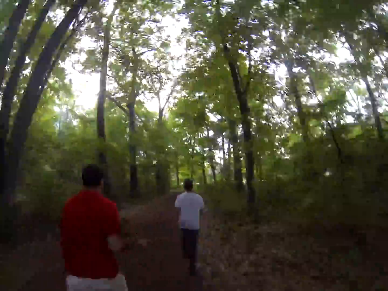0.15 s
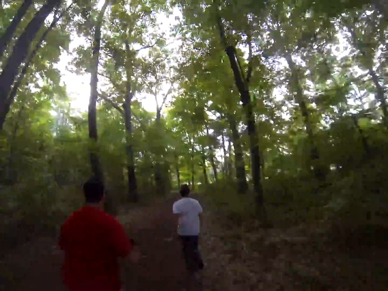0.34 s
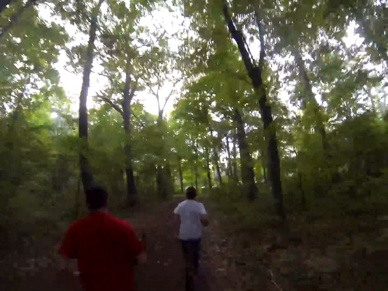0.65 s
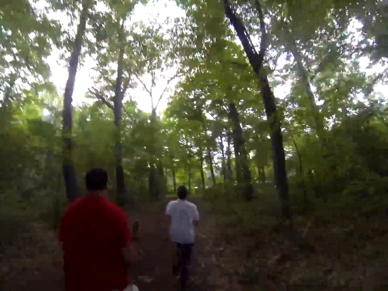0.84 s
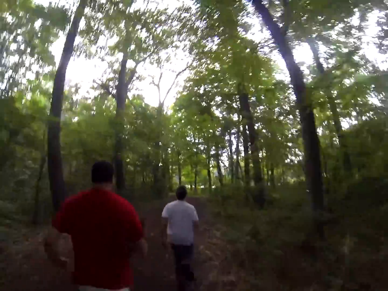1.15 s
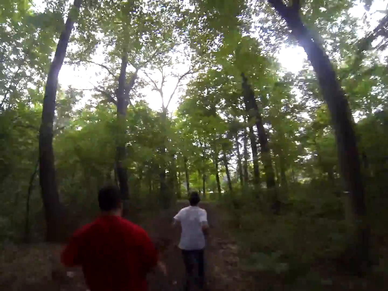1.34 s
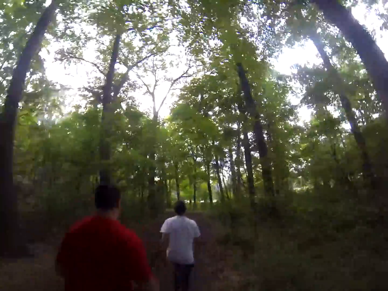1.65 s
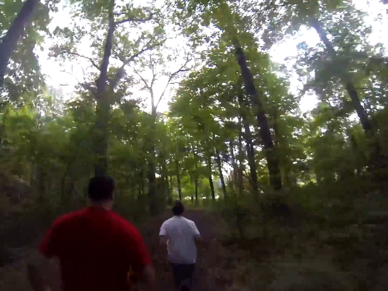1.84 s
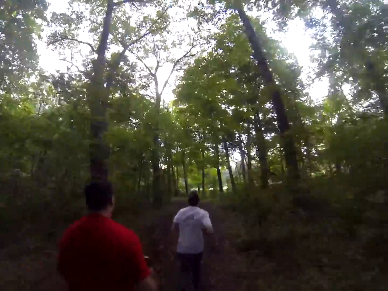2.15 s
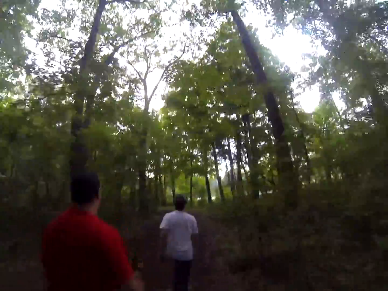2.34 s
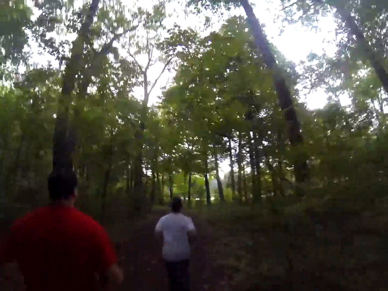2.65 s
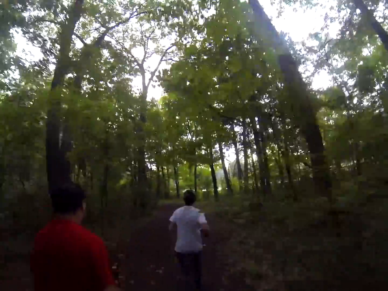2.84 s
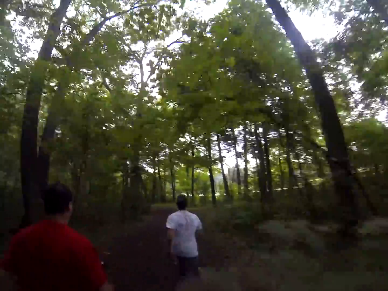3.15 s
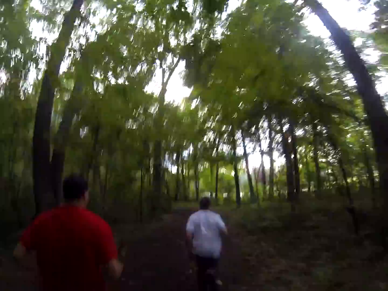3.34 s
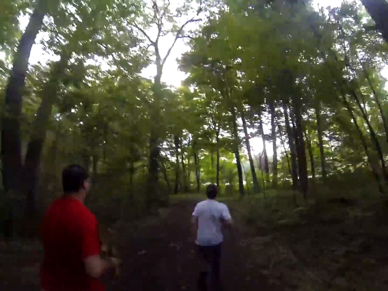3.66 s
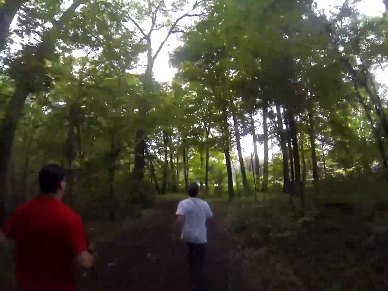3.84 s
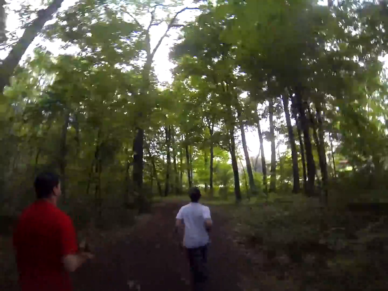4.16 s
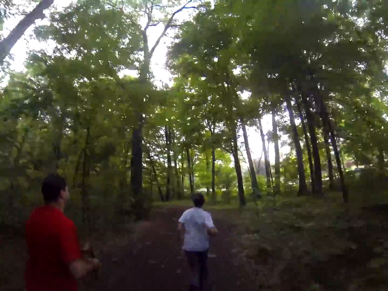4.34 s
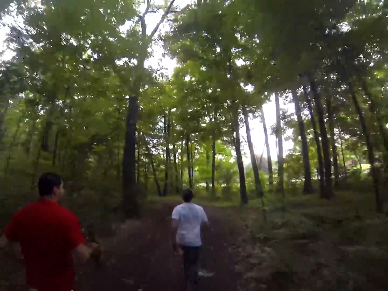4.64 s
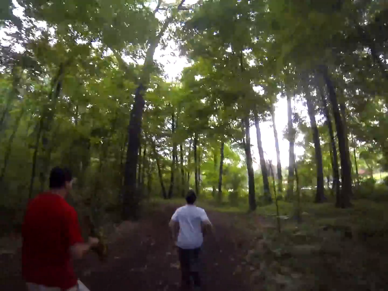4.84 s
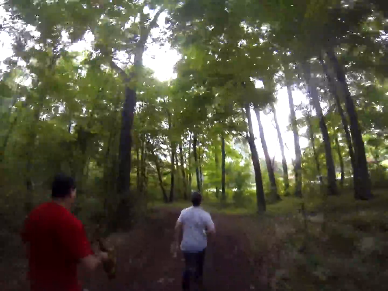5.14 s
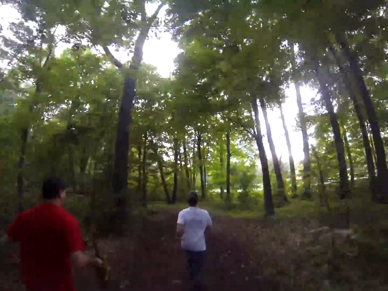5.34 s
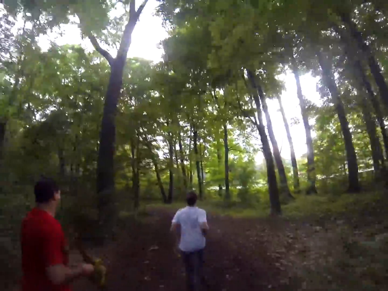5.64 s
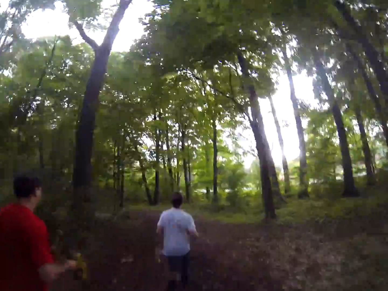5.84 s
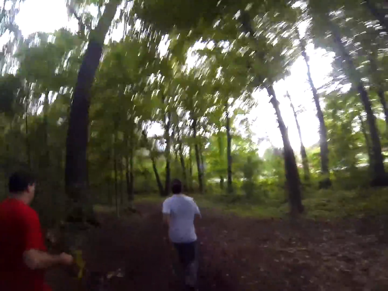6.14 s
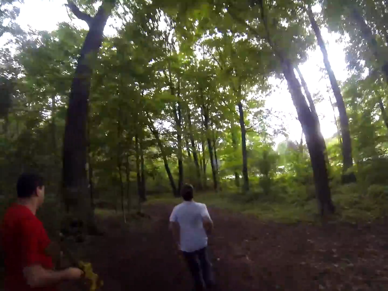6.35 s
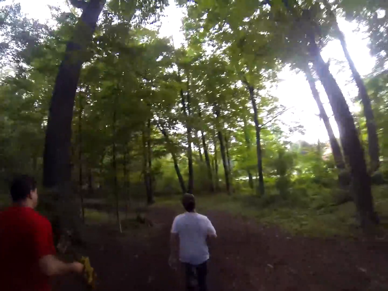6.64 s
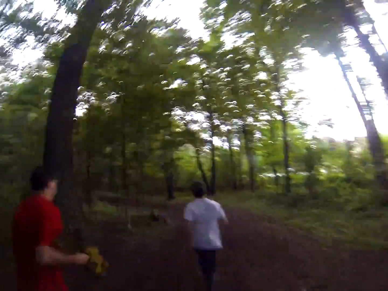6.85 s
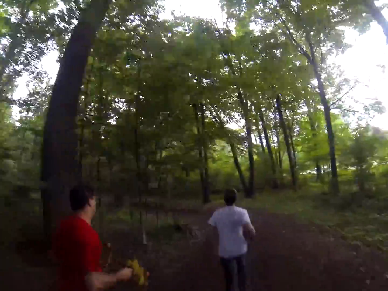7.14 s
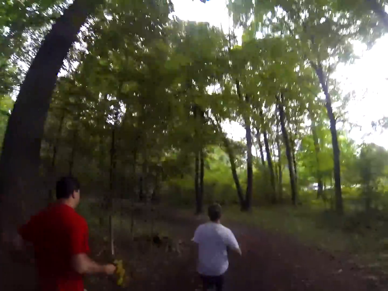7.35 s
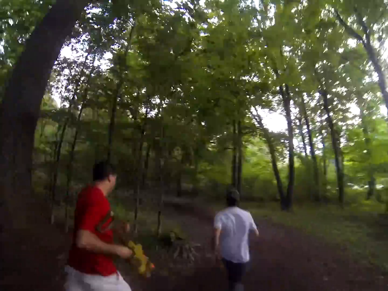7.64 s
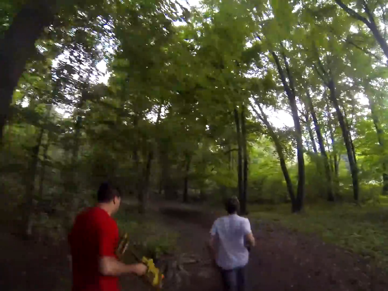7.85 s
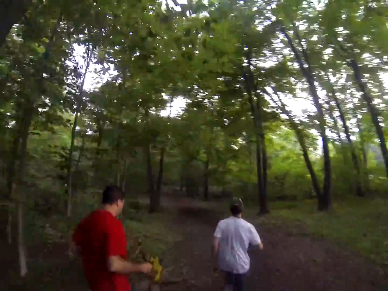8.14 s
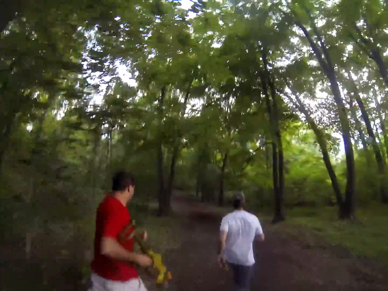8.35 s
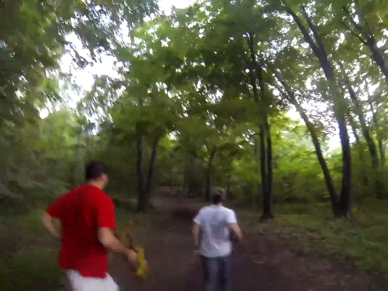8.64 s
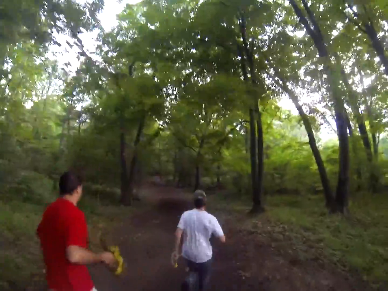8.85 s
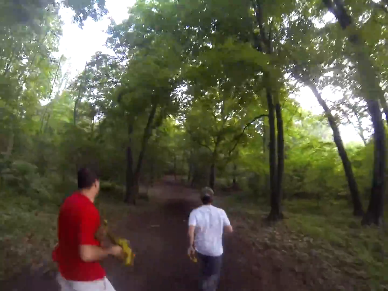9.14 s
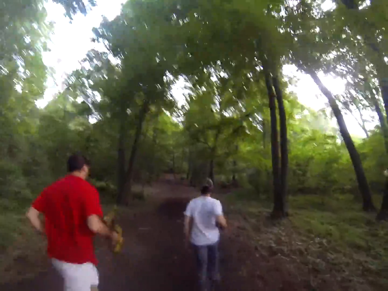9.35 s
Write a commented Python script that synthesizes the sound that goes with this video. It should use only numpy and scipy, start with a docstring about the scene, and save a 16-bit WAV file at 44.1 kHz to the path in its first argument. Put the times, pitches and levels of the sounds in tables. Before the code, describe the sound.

Close inside a plastic case worn by a jogger on a woodland dirt trail: steady footfalls, nearly three a second, crunch grit. Low wind rumbles and flaps with every stride over a soft rustle of cloth and leaves. Hard hollow knocks of the case strike now and then, clustering into a loud rattle after seven seconds, with twig snaps and stone clicks.

```python
"""Woodland trail run from inside a camera case

A jogger wearing a camera in a plastic case follows two others along a dirt trail in woods.
Wind is shaped noise surging with each stride; cloth, leaves, grit and stones are noise and random clicks,
coloured as they sound through the boxy shell. The case knocks on its loose mount as ringing modes struck
by a chattering contact, and wobbles as a slow decaying sine. Twigs snap, something brushes the case,
and a thin whistle comes and goes."""
import sys
import numpy as np
from scipy import signal
from scipy.fft import rfft, irfft, next_fast_len
from scipy.io import wavfile
from scipy.ndimage import uniform_filter1d, minimum_filter1d

SR = 44100
rng = np.random.default_rng(int(sys.argv[2]) if len(sys.argv) > 2 else 0)


def transcribe(signal):
    """Save signal, clipped to [-1, 1], as a 16-bit WAV file at the path in sys.argv[1]."""
    frames = np.atleast_2d(signal).T
    limited = np.clip(frames, -1, 1)
    pcm = np.round(limited * 32767).astype(np.int16)
    wavfile.write(sys.argv[1], SR, pcm)


N = 418509
TIME = np.arange(N) / SR  # s

# the wearer's footfalls (t/s, grit level/dB, rumble surge level/dB, buffeting level/dB), before gains
STRIDES = [(0.085, -22.5, -19, -27), (0.469, -16.5, -29, -27.5), (0.806, -21, -17.5, -23.5),
           (1.176, -21, -33, -32), (1.524, -21, -22.5, -26), (1.905, -15, -26, -35.5),
           (2.279, -19, -28, -25), (2.645, -21, -18, -36), (2.995, -23, -19, -25), (3.375, -10, -33, -26),
           (3.716, -21.5, -20, -31.5), (4.059, -19.5, -24, -32.5), (4.419, -16.5, -21, -25),
           (4.76, -18.5, -24, -31), (5.102, -19.5, -20.5, -26), (5.459, -14.5, -25.5, -26.5),
           (5.78, -17.5, -18, -26), (6.153, -16.5, -24, -30), (6.488, -19, -25, -27.5),
           (6.85, -17, -23.5, -23), (7.225, -15, -21, -24.5), (7.58, -16, -21, -26), (7.931, -18, -21, -33),
           (8.285, -17, -24, -28.5), (8.609, -19.5, -24, -24.5), (8.996, -15, -24, -27),
           (9.365, -23, -27, -28)]
# rustle of clothes and leaves (t/s, middle level/dB, treble level/dB), before gains
RUSTLE_LEVELS = [(0.0, -49, -67), (1.9, -48.5, -67), (2.14, -49.5, -69), (2.67, -44.5, -66.5),
                 (3.17, -50.5, -67.5), (5.08, -48, -67.5), (5.34, -48.5, -68), (6.1, -50, -66.5),
                 (6.29, -47.5, -67), (6.63, -49, -68.5), (7.14, -46, -66.5), (7.32, -56, -70),
                 (7.5, -52, -71), (7.93, -47.5, -65.5), (8.56, -49.5, -69.5), (8.96, -45.5, -64.5),
                 (9.17, -48, -65), (9.49, -51.5, -70)]
# a woody snap as it sounds inside the case (f/Hz, level/dB)
TWIG_SPECTRUM = [(450, 14), (880, -4.5), (1250, 2), (1750, -8.5), (2900, -13), (3600, -29), (4500, -48)]
# a bright crackle as it sounds inside the case (f/Hz, level/dB)
CRACKLE_SPECTRUM = [(1500, -18), (3000, -11.5), (4400, 1), (5500, -8), (7300, -16), (8600, 4.5),
                    (11000, -13), (15000, -20)]


def undb(db):
    """Decibels to gain."""
    return 10 ** (np.asarray(db) / 20)


def unit(x):
    """Scale to an rms of 1."""
    return x / np.sqrt(np.mean(x ** 2))


def curves(table):
    """The columns of a control table after its times, one value per sample."""
    s, *columns = np.transpose(table)
    return [np.interp(TIME, s, c) for c in columns]


def add(out, s, sound):
    """Mix a sound in at time s, trimmed to the scene."""
    i = int(s * SR)
    sound, i = sound[max(-i, 0):], max(i, 0)
    out[i:i + len(sound)] += sound[:max(N - i, 0)]


def colour(x, spectrum):
    """Filter by a (f/Hz, level/dB) spectrum, falling 24 dB per octave beyond its ends; rms 1."""
    hz, db = np.transpose(spectrum)
    size = next_fast_len(N)
    f = np.maximum(np.fft.rfftfreq(size, 1 / SR), 1)
    octaves_beyond = np.abs(np.log2(f / np.clip(f, hz[0], hz[-1])))
    gain_db = np.interp(np.log(f), np.log(hz), db) - 24 * octaves_beyond
    return unit(irfft(rfft(x, size) * undb(gain_db), size)[:N])


def drift(rate):
    """Random levels drawn rate times a second, smoothed twice; rms 1."""
    k = int(SR / rate)
    steps = np.repeat(rng.standard_normal(N // k + 1), k)
    return unit(uniform_filter1d(uniform_filter1d(steps, k), k)[:N])


def grains(rate, spread_db):
    """Random tiny clicks, about rate a second, of scattered size; rms 1."""
    size = undb(spread_db * np.minimum(rng.exponential(size=N), 5))
    return unit((rng.random(N) < rate / SR) * size * rng.standard_normal(N))


def eddies(spectrum, span):
    """Turbulent pressure: coloured noise whose strength is evened out over span seconds."""
    x = colour(rng.standard_normal(N), spectrum)
    return x / np.sqrt(uniform_filter1d(x ** 2, int(span * SR)) + 1e-3)


def hold(x, release_s):
    """Peak follower: rises at once and sinks exponentially."""
    sink = TIME / release_s
    return np.exp(np.maximum.accumulate(np.log(np.abs(x) + 1e-9) + sink) - sink)


def swells(times, levels_db, rise_s, fall_s):
    """An envelope that climbs to each level at its time and dies away again."""
    out = np.zeros(N)
    t = np.arange(-SR // 2, SR // 2) / SR
    shape = np.exp(np.minimum(t / rise_s, -t / fall_s))
    for s, db in zip(times, levels_db):
        add(out, s + t[0], undb(db) * shape)
    return out


def spells(table, column, edge=0.36):
    """A change in dB that comes and goes smoothly over each (t/s, length/s, ..) row."""
    out = np.zeros(N)
    for row in table:
        add(out, row[0], row[column] * signal.windows.tukey(int(row[1] * SR), edge))
    return out


def ring(modes, contact, stretch, scatter=0.018):
    """Modes rung by a contact force, each pitch scattered by that share; energy of 5 ms at rms 1."""
    t = np.arange(len(contact)) / SR
    hz, db, t60 = np.transpose(modes)[:, :, None]
    hz = hz * stretch * (1 + scatter * rng.standard_normal(hz.shape))
    # neighbouring modes push the microphone in opposite directions, so the ring swells over a cycle or two
    polarity = (-1) ** np.arange(len(modes))[:, None]
    decay = np.exp(-np.log(1000) * t / t60)
    response = np.sum(polarity * undb(db) * decay * np.sin(2 * np.pi * hz * t), axis=0)
    y = signal.fftconvolve(contact, response)[:len(t)]
    return y / np.sqrt(np.sum(y ** 2) / (.005 * SR))


def soften(x, hz):
    """A contact of finite length carries little above hz."""
    return signal.sosfilt(signal.butter(4, hz, fs=SR, output="sos"), x)


def wind(rumble_db=-34.0, buffet_db=-34.5, surge_gain_db=1, wander_db=2.5, flutter_db=1.0):
    """Large eddies rumble and small ones flap on the case: head wind, a surge each stride, stray gusts."""
    # stray gusts between footfalls (t/s, rumble level/dB, buffeting level/dB)
    gusts = [(0.02, -50, -22), (0.2, -38, -36), (0.31, -32, -25.5), (0.56, -37, -55), (0.93, -41, -27),
             (1.1, -33, -27.5), (1.25, -23.5, -47), (1.46, -23.5, -28), (1.691, -24.5, -41),
             (1.8, -45, -33), (1.88, -35, -44), (2.02, -37, -42), (2.15, -40, -32.5), (2.46, -47, -37),
             (2.57, -38, -32), (2.86, -28, -34), (3.1, -30, -43), (3.54, -48, -36), (3.63, -33, -31),
             (3.8, -28, -35.5), (3.97, -46, -26), (4.31, -25, -27), (4.56, -27, -34), (4.66, -26, -33),
             (5.219, -32, -31), (5.35, -28, -38), (5.92, -21.5, -29), (6.06, -44, -26), (6.26, -37, -37),
             (6.45, -29, -23), (6.659, -40, -27), (7.16, -25.5, -41), (7.305, -18.5, -44),
             (7.721, -37, -29), (7.82, -32, -31), (8.04, -24, -25.5), (8.47, -26, -24.5), (8.82, -34, -46),
             (9.25, -22, -34)]
    # slow rumble inside the case (f/Hz, level/dB)
    rumble_spectrum = [(10, -19), (22, 5.5), (35, -3.5), (60, -10), (90, -13.5), (130, -25), (250, -71)]
    # faster buffeting inside the case (f/Hz, level/dB)
    buffet_spectrum = [(50, 2.5), (95, 0.5), (150, 0.5), (220, -3), (310, -8), (450, -14), (650, -19.5),
                       (1200, -32.5)]
    s, _, surge_db, build_db = np.transpose(STRIDES)
    # within a stride the air builds as the body drops, then shoves the case just after landing
    build = swells(s + 0.0082, build_db, rise_s=0.1, fall_s=0.041)
    surge = swells(s + 0.037, surge_db + surge_gain_db, rise_s=0.022, fall_s=0.039)
    gust_s, *gust_db = np.transpose(gusts)
    gust_low, gust_high = (swells(gust_s, db, rise_s=0.058, fall_s=0.051) for db in gust_db)
    head_wind = undb(wander_db * drift(9.1))
    # independent gusts add as powers
    rumble = np.linalg.norm([undb(rumble_db) * head_wind, surge, gust_low], axis=0)
    buffet = np.linalg.norm([undb(buffet_db) * head_wind, build, gust_high], axis=0)
    buffet = buffet * undb(flutter_db * drift(40))
    return rumble * eddies(rumble_spectrum, span=0.06) + buffet * eddies(buffet_spectrum, span=0.0456)


def rustle(hollow_gain_db=4, swish_gain_db=-1, sleeve_gain_db=-0.5, flicker_db=2.37, folds_db=2.24,
           swing_db=0.15):
    """Cloth and dry leaves: dense grains through the case's cavity and walls, a touch louder each footfall."""
    # sleeves sweep past the case (t/s, length/s, middle lift/dB, treble lift/dB)
    swishes = [(0.57, 0.18, 2.5, 2.5), (1.15, 0.14, 2.5, 5), (2.45, 0.2, 3.5, 6.5), (4.39, 0.092, 4, 2.5),
               (5.06, 0.1, 0, 3), (5.25, 0.089, 1.5, 4), (8.08, 0.17, 1.5, 5), (8.43, 0.19, -1.5, 6),
               (8.6, 0.1, 4, 4), (8.78, 0.048, 1, 9), (9.13, 0.17, 1, 3)]
    # rustle through the air cavity (f/Hz, level/dB)
    hollow_spectrum = [(300, -27), (500, -5), (620, -2), (780, 1), (930, 2), (1050, -2), (1200, -14),
                       (2000, -58)]
    # rustle through the walls (f/Hz, level/dB)
    swish_spectrum = [(900, -21), (1250, -3), (1500, -1.5), (1720, 4.5), (1950, 0.5), (2350, -9),
                      (2900, -8.5), (3400, -20.5), (4500, -49.5)]
    # steady treble of cloth (f/Hz, level/dB)
    hiss_spectrum = [(2500, -7.5), (3600, 1.5), (4400, -4), (5300, -6.5), (6200, -12.5), (7300, -15.5),
                     (8600, -12.5), (9600, -18), (11000, -13.5), (15000, -26)]
    # a sleeve sweeping past, as it sounds inside the case (f/Hz, level/dB)
    sleeve_spectrum = [(2500, -7), (3600, 3.5), (4400, -2), (5300, -5.5), (6100, -18), (7300, -20),
                       (8600, -14), (11000, -20)]
    middle_db, treble_db = curves(RUSTLE_LEVELS)
    middle_lift_db, treble_lift_db = (spells(swishes, column) for column in (2, 3))
    stride_phase = np.interp(TIME, np.transpose(STRIDES)[0], np.arange(len(STRIDES)))
    swing = np.cos(2 * np.pi * stride_phase)
    hollow = undb(middle_db + hollow_gain_db) * colour(grains(rate=5400, spread_db=1.0), hollow_spectrum)
    swish_level = undb(middle_db + middle_lift_db + swish_gain_db)
    swish = swish_level * colour(grains(rate=8000, spread_db=-0.5), swish_spectrum)
    # a passing sleeve adds its own hiss; folds of fabric catch and let go
    sweep = np.sqrt(np.maximum(undb(treble_lift_db) ** 2 - 1, 0))
    sleeve = undb(sleeve_gain_db) * sweep * colour(grains(rate=9000, spread_db=3.0), sleeve_spectrum)
    cloth = colour(rng.standard_normal(N), hiss_spectrum)
    hiss = undb(treble_db + folds_db * drift(25)) * (cloth + sleeve)
    return ((hollow + swish) * undb(flicker_db * drift(45)) + hiss) * undb(swing_db * swing)


def leaves(leaf_db=-15, twig_db=2, tick_s=0.0019):
    """Leaf litter ticks here and there as short noise bursts, following the treble level of the rustle."""
    t = np.arange(SR // 100) / SR
    tick = rng.standard_normal(len(t)) * np.exp(-t / tick_s)
    out = np.zeros(N)
    for spectrum, db in ((TWIG_SPECTRUM, twig_db), (CRACKLE_SPECTRUM, leaf_db)):
        ticks = signal.fftconvolve(grains(rate=60, spread_db=1), tick)[:N]
        out += undb(db) * colour(ticks, spectrum)
    _, treble_db = curves(RUSTLE_LEVELS)
    return undb(treble_db) * out


def footsteps(step_db=-15.0, clumps_db=3, crunch_db=-17, clod_s=0.002):
    """Each sole crushes a short, uneven burst of grit, and a few clods crumble one by one."""
    # other scuffs of grit, the one near 8.46 s with the brush on the case (t/s, level/dB), before gains
    scuffs = [(0.02, -21), (0.331, -22), (1.699, -23), (2.041, -25.5), (2.389, -23.5), (2.712, -24.5),
              (6.76, -26), (7.116, -15), (7.784, -19.5), (8.458, -18)]
    # grit as it sounds inside the case (f/Hz, level/dB)
    dirt_spectrum = [(250, -13.5), (550, 8), (880, 13.5), (1250, 1.5), (1700, 2.5), (2300, -4),
                     (3000, -11.5), (4300, -32.5), (6000, -38), (8600, -44), (15000, -51)]
    s, db = np.transpose([row[:2] for row in STRIDES] + list(scuffs))
    grit = colour(grains(rate=1200, spread_db=1.0) * undb(clumps_db * drift(180)), dirt_spectrum)
    breaks = np.abs(grains(rate=130, spread_db=1))
    clods = colour(hold(breaks, clod_s) * rng.standard_normal(N), dirt_spectrum)
    tread = swells(s, db, rise_s=0.012, fall_s=0.024)
    return tread * (undb(step_db) * grit + undb(crunch_db) * clods)


def roars(flutter_db=0.5):
    """Separate rough lumps of wind flap on the case, at their own listed times."""
    # lumps of wind (t/s, level/dB)
    lumps = [(0.1, -35), (0.31, -38), (0.821, -23.5), (1.5, -27.5), (1.71, -34), (1.85, -36.5), (2.2, -35),
             (2.96, -30.5), (3.06, -36), (3.36, -36), (4.03, -31), (4.38, -35), (4.7, -40), (5.1, -29.5),
             (5.4, -31), (5.83, -38), (6.15, -30.5), (6.72, -37), (6.87, -41), (7.25, -37), (7.71, -32),
             (7.97, -28.5), (8.3, -31.5), (8.57, -26.5), (9.0, -33.5)]
    # their roar inside the case (f/Hz, level/dB)
    roar_spectrum = [(140, -3), (200, 0), (290, -1), (400, -5.5), (520, -16), (800, -31.5)]
    s, db = np.transpose(lumps)
    strength = swells(s, db, rise_s=0.044, fall_s=0.03) * undb(flutter_db * drift(60))
    return strength * eddies(roar_spectrum, span=0.04)


def stones():
    """Small stones grind and click under a sole: brief swells of dense grains."""
    # stones clicking underfoot (t/s, level/dB)
    clicks = [(0.12, -30.5), (2.005, -31), (2.042, -33.5), (2.72, -33), (2.963, -26), (3.12, -35),
              (3.381, -25), (3.393, -31), (3.777, -34), (5.098, -32), (5.111, -30), (5.434, -28),
              (5.462, -29), (5.79, -30), (6.152, -33), (6.43, -30), (6.778, -30), (6.852, -31),
              (7.574, -26), (7.767, -33), (7.786, -27), (7.794, -33), (8.016, -29.5), (8.153, -27),
              (8.287, -32), (8.412, -34), (8.602, -34), (8.985, -35), (8.997, -25), (9.146, -32),
              (9.338, -32), (9.37, -33)]
    # the hard, dry click of a stone as it sounds inside the case (f/Hz, level/dB)
    gravel_spectrum = [(450, -1), (850, 9.5), (1250, 0.5), (1750, 6.5), (2400, -11), (3050, -5.5),
                       (3500, -22), (4400, -28.5), (5500, -44)]
    s, db = np.transpose(clicks)
    grind = colour(grains(rate=6000, spread_db=-0.5), gravel_spectrum)
    return swells(s, db, rise_s=0.00043, fall_s=0.0026) * grind


def crackle():
    """Twigs and dry leaves snap underfoot: abrupt bursts of woody and bright noise."""
    # breaks underfoot (t/s, woody snap level/dB, bright crackle level/dB)
    snaps = [(0.333, -28, -56), (0.683, -21, -76), (1.008, -21.5, -62), (1.177, -30, -54),
             (1.699, -19.5, -76), (1.706, -39, -72), (2.161, -34, -65), (2.399, -27, -70),
             (4.418, -35, -67), (4.791, -41, -45), (4.807, -25, -75), (5.102, -43, -63), (5.112, -43, -68),
             (5.46, -37, -68), (6.107, -24, -78), (6.488, -27.5, -72), (6.766, -26, -73), (6.773, -25, -72),
             (6.843, -40, -55), (6.878, -21, -66), (6.903, -24, -72), (7.124, -20.5, -69),
             (7.149, -37, -54), (7.173, -24, -64), (7.835, -27, -56), (8.261, -25.5, -74),
             (8.448, -17.5, -36.5), (8.4569, -16, -52), (9.15, -28, -60), (9.29, -25.5, -74)]
    s, woody_db, bright_db = np.transpose(snaps)
    out = np.zeros(N)
    for spectrum, db in ((TWIG_SPECTRUM, woody_db), (CRACKLE_SPECTRUM, bright_db)):
        burst = swells(s, db, rise_s=0.00041, fall_s=0.0024)
        out += burst * colour(rng.standard_normal(N), spectrum)
    return out


def knocks(chatter=0.095, chatter_s=0.0016, slide_db=-36, slide_s=0.0019, tail_db=-45, tail_s=0.0065,
           thud_db=-12, wall_db=-1, crack_db=-11, crack_s=0.0011, rasp_db=-7.0, rasp_s=0.004,
           rasp_hz=(900, 4200), ping_db=-35, tick_db=-16.5, corner_db=20.5):
    """The case slides briefly, hits its stop, chatters, and leaves the mount shivering."""
    # case knocking on its mount (t/s, level/dB, body ring relative level/dB,
    # place of contact from 0 flat wall to 1 hard corner)
    blows = [(0.4548, -11.5, -6.5, 0.19), (0.4599, -12.5, -16, 0.42), (0.4727, -29, -2, 0.27),
             (0.48, -33, 2, 0.1), (0.503, -37, 1, 0.11), (0.683, -31.5, 10.5, 0.17),
             (0.8247, -26.5, -8, 0.068), (1.005, -35.5, 10, 0.054), (1.01, -33.5, 10, 0.03),
             (1.903, -6.5, -10.5, 0.18), (1.904, -18, -10, 0.76), (1.918, -30, -5, 0.2),
             (1.94, -27.5, 1, 0.069), (2.257, -48, 20.5, 0.16), (2.2989, -24, -11, 0.11),
             (2.6421, -7.5, -6.5, 0.092), (3.004, -35, 6, 0.19), (3.0592, -33, 6.5, 0.56),
             (3.3644, -13, -6.5, 0.2), (3.369, -21.5, -8, 0.43), (3.7309, -29, -1, 0.3),
             (4.0595, -18.5, -4, 0.24), (4.7903, -9, -10.5, 0.34), (5.442, -38, 11, 0.29),
             (5.763, -32, 4, 0.37), (6.1754, -39, 2, 0.6), (6.179, -17, -4.5, 0.54), (6.86, -33.5, 8, 0.47),
             (7.2352, -2, -22, 0.21), (7.2363, -13, 2, 0.37), (7.251, -18, -11, 0.62),
             (7.2553, -10.5, 1, 0.49), (7.2776, -20, -2, 0.56), (7.2837, -11, -3.5, 0.89),
             (7.3247, -18, -2.5, 0.71), (7.4433, -48.5, 17, 0.82), (7.582, -32, 7.5, 0.22),
             (7.5943, -21.5, -2, 0.88), (7.5966, -16.5, -3.5, 0.67), (7.6233, -21, -4, 0.57),
             (7.6327, -29, -4, 0.98), (7.931, -23.5, -2, 0.027), (7.9588, -31, -1, 0.12),
             (7.9622, -24.5, -2, 0.76), (8.1493, -37, 8.5, 0.47), (8.3052, -22.5, -8, 0.07),
             (8.3244, -25, -2, 0.7), (8.3272, -18.5, -3.5, 0.82), (8.4491, -22.5, 5.5, 0.83),
             (8.6311, -23.5, 1, 0.47), (8.659, -34, 2.5, 0.1), (8.669, -32.5, 2, 0.88),
             (8.8254, -44, 21.5, 1), (9.0149, -19.5, -4, 0.45), (9.018, -22.5, -0.5, 0.25),
             (9.04, -23, 0, 0.036), (9.0436, -29, -3, 0.076), (9.3867, -22, 0, 0.63),
             (9.3895, -26, -5, 0.31), (9.393, -40, 3, 0.3), (9.4126, -27.5, -0.5, 0.02)]
    # modes of the case, before stretch: lowest thud (f/Hz, level/dB, t60/s)
    thud_modes = [(268, -0.47, 0.017), (423, -0.89, 0.019), (507, 0.71, 0.0074)]
    # body of the case (f/Hz, level/dB, t60/s)
    body_modes = [(620, -3, 0.0045), (793, 4.5, 0.022), (1036, -5.5, 0.0083)]
    # walls of the case (f/Hz, level/dB, t60/s)
    wall_modes = [(1260, -5, 0.0085), (1393, -3, 0.0052), (1520, 1.5, 0.0055), (1747, 2, 0.0081),
                  (2270, -7, 0.0097), (2500, -6, 0.0059), (2830, -8.5, 0.0065)]
    # bright tick of the case (f/Hz, level/dB, t60/s)
    tick_modes = [(3180, -2, 0.026), (3620, -3, 0.016), (4300, -3.5, 0.011), (5580, -11.5, 0.0057),
                  (6320, -11.5, 0.0081), (8850, -22.5, 0.008)]
    # a small stiff part of the mount rings on faintly (f/Hz, level/dB, t60/s)
    ping_modes = [(3100, -3, 0.15), (3600, -5, 0.082), (5530, -14, 0.07)]
    out, t = np.zeros(N), np.arange(-SR // 100, SR // 8) / SR
    age = np.abs(t)
    struck = t >= 0
    slide = undb(slide_db) * np.exp(-age / slide_s)
    settle = chatter * np.exp(-age / chatter_s) + undb(tail_db) * np.exp(-age / tail_s)
    rasp_band = signal.butter(2, rasp_hz, "bandpass", fs=SR, output="sos")
    for s, db, body_db, place in blows:
        contact = (t == 0) + np.where(t < 0, slide, settle) * rng.standard_normal(len(t))
        # from flat wall to corner the body modes sink, the wall modes rise and the blow brightens
        body_stretch = np.interp(place, (0, 1), (1.15, 0.92))
        wall_stretch = np.interp(place, (0, 1), (0.898, 1.088))
        contact_hz = np.interp(place, (0, 1), (2800, 4200))
        thud = undb(thud_db + max(body_db, 0)) * ring(thud_modes, contact, 0.99)
        low = undb(body_db) * ring(body_modes, contact, body_stretch)
        mid = undb(wall_db) * ring(wall_modes, contact, wall_stretch)
        # many small, quickly damped parts rasp between the main modes
        rasp_noise = unit(signal.sosfilt(rasp_band, rng.standard_normal(len(t))))
        rasp = undb(rasp_db) * struck * np.exp(-age / rasp_s) * rasp_noise
        # a bright ring and a toneless crack grow with the force of the blow and towards a corner
        crack = undb(crack_db) * struck * np.exp(-age / crack_s) * rng.standard_normal(len(t))
        tick = undb(tick_db + db + corner_db * place)
        high = tick * (ring(tick_modes, contact * struck, 0.98) + crack)
        ping = undb(ping_db) * ring(ping_modes, 1. * (t == 0), 1, scatter=0.0021)
        dull = soften(thud + low + mid + rasp, contact_hz)
        add(out, s + t[0], undb(db) * (ping + dull + high))
    return out


def wobble(hz=28, decay_s=0.032):
    """The camera swings on its mount and pumps the air in the case for a few slow cycles."""
    # hard landings set the camera wobbling (t/s, level/dB)
    landings = [(0.478, -19), (1.912, -17), (2.304, -17), (2.655, -24), (3.385, -11.5), (4.075, -28),
                (6.185, -19), (7.288, -22), (7.605, -15.5), (7.94, -5), (8.318, -14.5), (8.645, -14),
                (9.401, -13)]
    out, t = np.zeros(N), np.arange(SR // 4) / SR
    swing = (1 - np.exp(-t * hz * 4)) * np.exp(-t / decay_s) * np.sin(2 * np.pi * hz * t)
    for s, db in landings:
        add(out, s, undb(db) * swing)
    return out


def whistle(centre_hz=1680, width_hz=170, broken_db=3):
    """A narrow, airy resonance that swells and breaks up: band-passed noise."""
    # a thin whistle comes and goes (t/s, length/s, level/dB)
    whistles = [(1.95, 0.16, -43), (6.29, 0.21, -45.5), (7.06, 0.15, -47)]
    band = centre_hz + width_hz * np.array([-.5, .5])
    band_filter = signal.butter(3, band, "bandpass", fs=SR, output="sos")
    air = signal.sosfilt(band_filter, rng.standard_normal(N))
    tone = unit(air * undb(broken_db * drift(70)))
    flow = np.zeros(N)
    for s, length, db in whistles:
        add(flow, s, undb(db) * signal.windows.tukey(int(length * SR), .5))
    return flow * tone


def brushes(uneven_db=5.0):
    """Short, bright, uneven rubs that start and stop abruptly."""
    # something brushes along the case (t/s, length/s, level/dB, fade/dB)
    rubs = [(3.274, 0.088, -40.5, -3), (3.362, 0.122, -44.5, -1), (8.444, 0.029, -34, -13),
            (8.47, 0.16, -48, -11)]
    # the rub as it sounds inside the case (f/Hz, level/dB)
    brush_spectrum = [(600, -27), (1200, -8), (1750, 8.5), (2400, -3), (3500, -8.5), (5000, -17.5),
                      (6600, -23.5), (7400, -40), (8600, -18), (9600, -30), (11000, -26), (15000, -43)]
    pressure = np.zeros(N)
    for s, length, db, fade_db in rubs:
        count = int(length * SR)
        add(pressure, s, undb(db + np.linspace(0, fade_db, count)) * signal.windows.tukey(count, .08))
    rub = colour(grains(rate=4000, spread_db=1.5), brush_spectrum)
    return pressure * undb(uneven_db * drift(83)) * rub


def scene():
    """Everything meets at the one microphone inside the case."""
    # moments when the whole background dips, wind and rustle, several just after hard knocks
    # (t/s, length/s, wind change/dB, rustle change/dB)
    dips = [(1.28, 0.049, -2.5, -2), (2.66, 0.16, -5.5, -3), (4.12, 0.11, -2.5, 0.5),
            (4.785, 0.28, -1, -3.5), (6.55, 0.066, -3.5, 1.5), (7.3, 0.25, -7, -0.5),
            (8.16, 0.065, -7.5, -2.5), (8.85, 0.14, -7, -5.5), (9.09, 0.082, -2.5, 0),
            (9.42, 0.065, -16, -0.5)]
    wind_dip, rustle_dip = (undb(spells(dips, column)) for column in (2, 3))
    air = wind_dip * wind() + roars() + whistle()
    litter = rustle_dip * (rustle() + leaves())
    ground = footsteps() + stones() + crackle()
    case = knocks() + wobble() + brushes()
    return (air + litter + ground + case)[None]


def record(dry, release_s=0.2, top_hz=15400):
    """A limiter holds the hardest knocks at full scale and recovers slowly; the top is cut."""
    gain = 1 / np.maximum(hold(dry[0], release_s), 1)
    # the gain ducks about 1 ms ahead of a peak and is smoothed over 2 ms
    gain = uniform_filter1d(minimum_filter1d(gain, size=89), size=89)
    top_cut = signal.ellip(8, .2, 70, top_hz, fs=SR, output="sos")
    return signal.sosfilt(top_cut, dry * gain)


dry = scene()
out = record(dry)
transcribe(out)
```